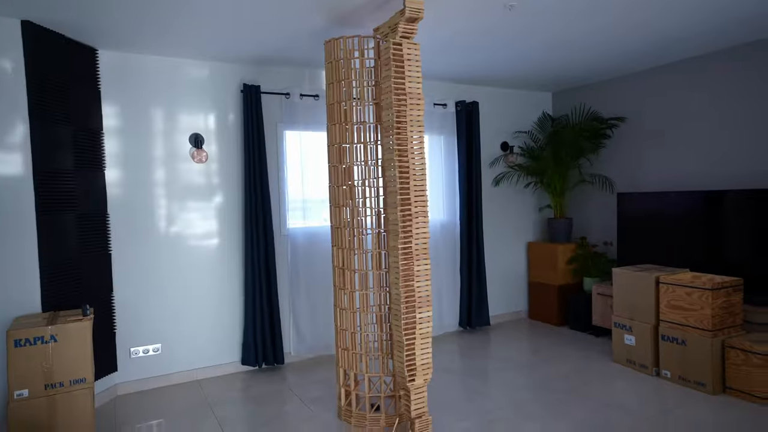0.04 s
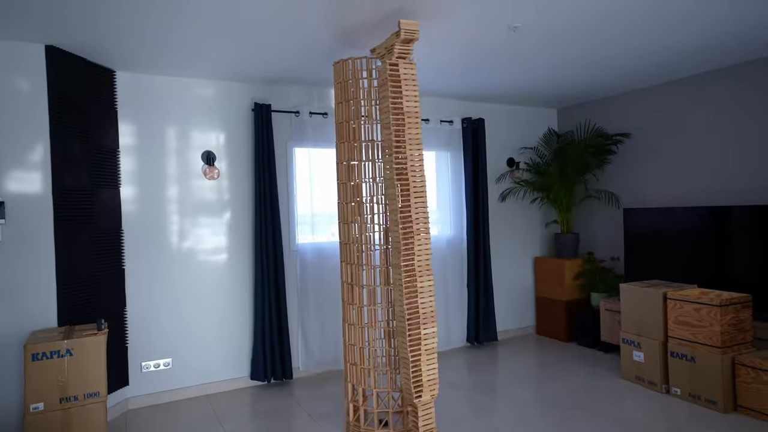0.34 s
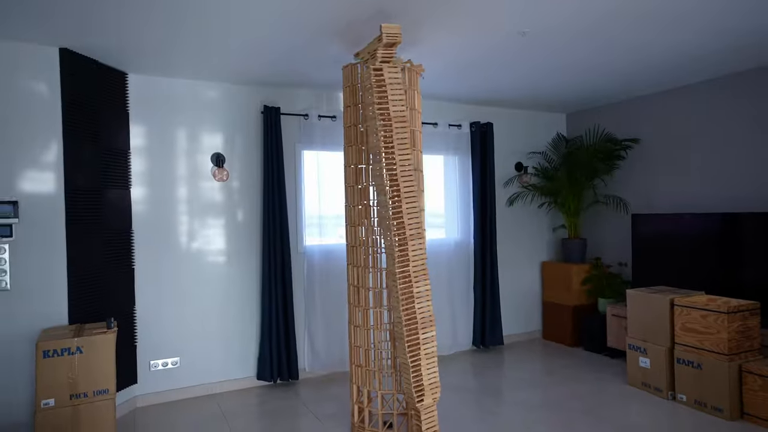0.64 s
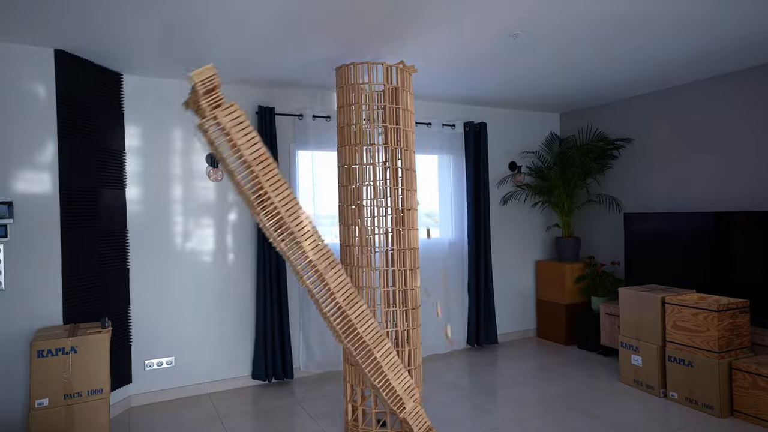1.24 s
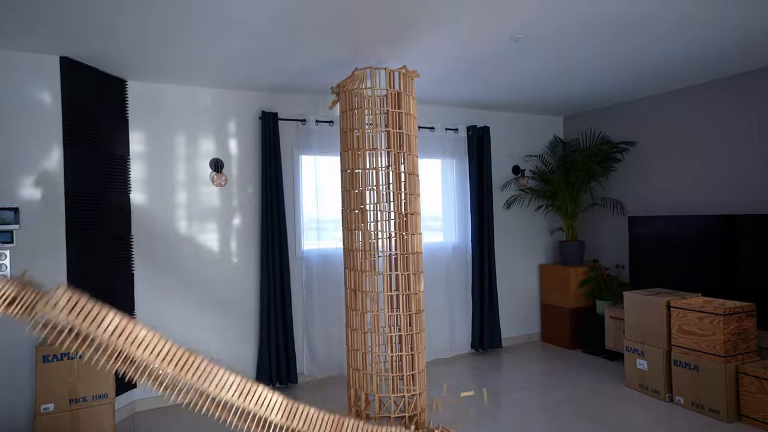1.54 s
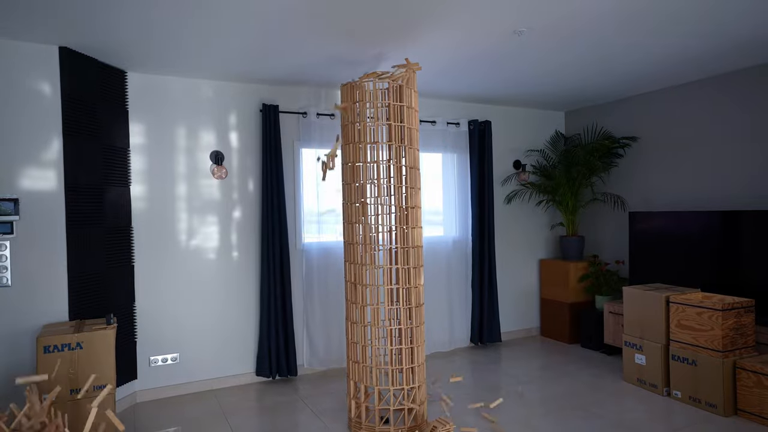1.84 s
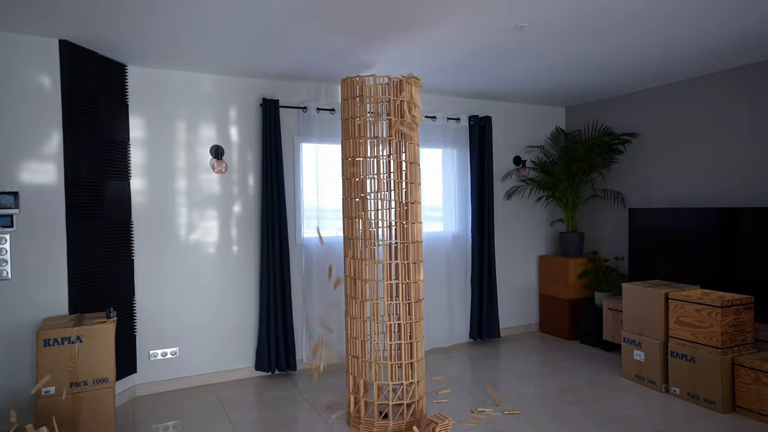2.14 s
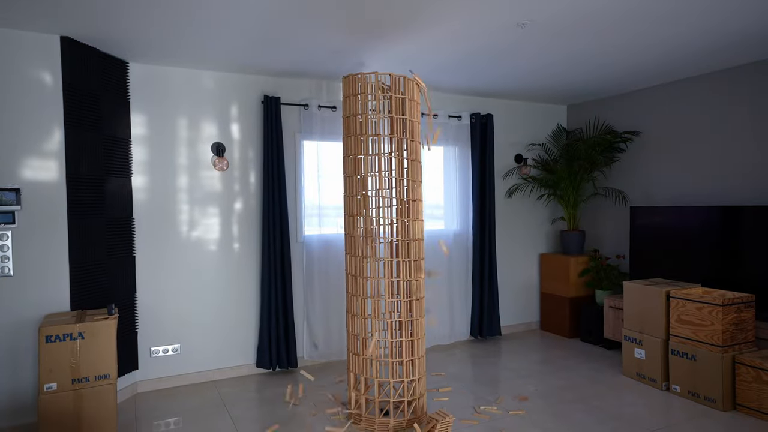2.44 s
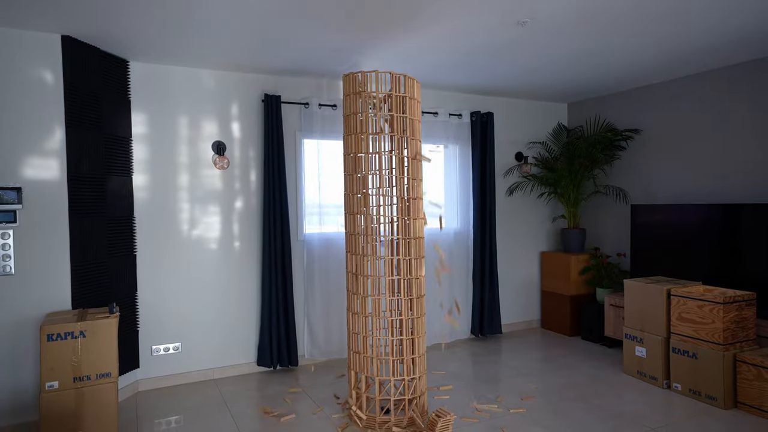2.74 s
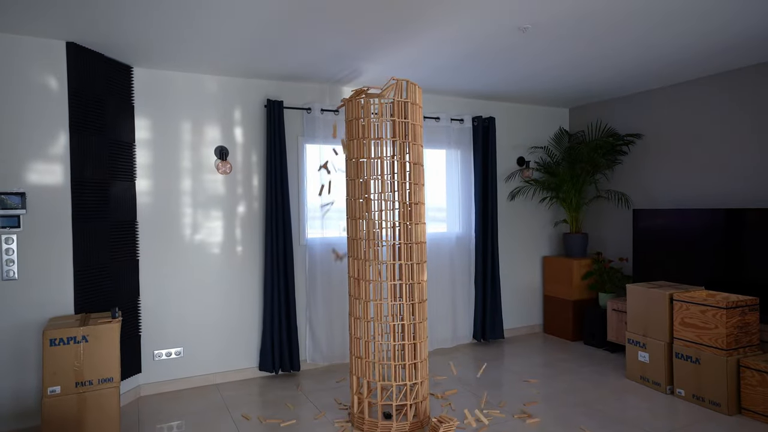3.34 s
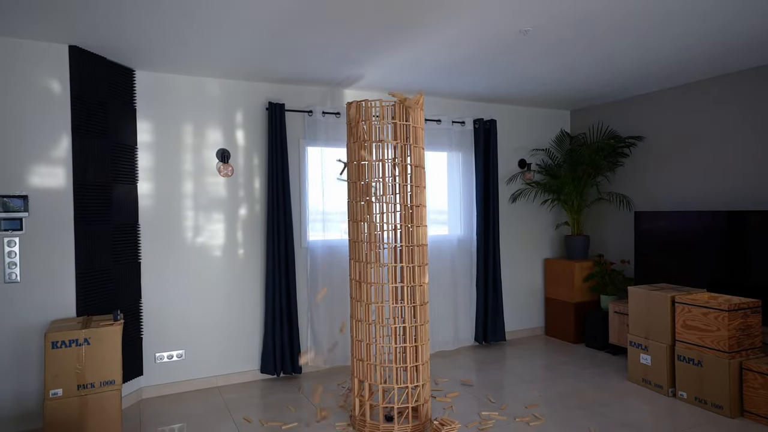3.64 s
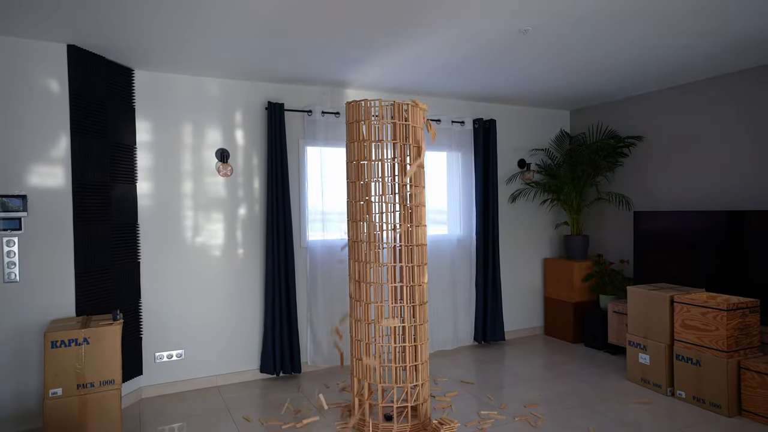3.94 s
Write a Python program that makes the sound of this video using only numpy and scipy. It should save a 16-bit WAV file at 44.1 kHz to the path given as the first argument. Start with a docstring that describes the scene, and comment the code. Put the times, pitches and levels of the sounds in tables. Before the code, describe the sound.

Small wooden planks clatter as a stack collapses in a bare, ringing room. For the first second they slip and tap lightly over a very faint hum. At about 1.3 seconds the stack gives way with a rattle and a loud crash, with dull thuds near 1.4 and 1.6 seconds. Planks keep showering onto the hard floor in batches until about 4 seconds, with sharp single landings standing out.

```python
"""A tall stack of small wooden planks collapses on a hard floor in a bare, ringing room.
First it leans: planks slip softly and loose ones tap, over a faint hum. At 1.27 s it gives way: a
lower-pitched piece chatters, the hum sinks, two dull thuds follow. Planks then rain down in batches,
each contact a dry crack, a dull knock and ringing bending modes; single hard landings stand out."""
import sys
import numpy as np
from scipy import signal
from scipy.fft import rfft, irfft, next_fast_len
from scipy.io import wavfile
from scipy.ndimage import uniform_filter1d, minimum_filter1d

SR = 44100
rng = np.random.default_rng(int(sys.argv[2]) if len(sys.argv) > 2 else 0)


def log_audio(samples):
    """Write samples as a 16-bit WAV file to the path given in sys.argv[1]."""
    # one column per channel
    frames = np.atleast_2d(samples).T
    # limit to full scale, then quantise
    limited = np.clip(frames, -1, 1)
    pcm = np.round(limited * 32767).astype(np.int16)
    wavfile.write(sys.argv[1], SR, pcm)


N = 176400

# planks that slip or land together: start_s, end_s, first_mode_hz, level_db, hardness_db, weight_db
# hardness offsets cracks and higher modes; weight offsets knocks
BATCHES = [(0, 0.116, 2716, -23, 3.5, -7), (0.173, 0.275, 2760, -27.5, -8, -7),
           (0.304, 0.377, 2840, -27.5, 3.5, -6.5), (0.43, 0.522, 2970, -36.5, 11.5, -4),
           (0.666, 0.76, 2824, -30.5, 5, -15), (0.837, 0.93, 2900, -35, 4.5, -1.5),
           (0.898, 0.99, 2760, -35.5, 0.5, -1.5), (1.026, 1.085, 2440, -24, -5.5, -8),
           (1.13, 1.28, 2710, -32, 4.5, -7.5), (1.381, 1.571, 2840, -12, -6, -20.5),
           (1.6, 1.77, 2760, -24.5, 9.5, -8), (1.774, 1.917, 2740, -19.5, 3.5, -13),
           (1.991, 2.26, 2806, -21, 1, -17.5), (2.232, 2.338, 2680, -20, 5.5, -15),
           (2.374, 2.606, 2644, -18.5, 0, -22.5), (2.609, 2.773, 2747, -19.5, 1.5, -15.5),
           (2.864, 3.008, 2540, -24, 3, -11), (2.963, 3.147, 2624, -29, 10, -11),
           (3.161, 3.233, 2800, -20, 0, -17.5), (3.302, 3.59, 2840, -22.5, -1.5, -15),
           (3.559, 3.74, 2726, -27, 8.5, -22), (3.774, 3.882, 2810, -23, 2, -13)]
# crack spectrum: freq_hz, gain_db
CRACK_SPECTRUM = [(100, -46), (900, -18), (1800, 5.5), (3600, 11.5), (7500, 10.5), (10900, 1.5),
                  (12800, 8.5), (13900, -0.5), (15500, 1)]
# knock spectrum: freq_hz, gain_db
KNOCK_SPECTRUM = [(60, -19), (120, 0.5), (280, 1), (500, -3.5), (1000, 3), (1700, 6), (3000, 8.5),
                  (8000, -23)]
COLLAPSE_S, CRACK_T60_S = 1.267, .0073


def shower(count=4400, knock_t60_s=.027, slip_cutoff_hz=11200):
    """Hundreds of planks hit each other and the floor, each with its own pitch and force."""
    # plank modes, lowest bending mode first: pitch_hz, level_db, t60_s
    modes = [(2759, -4.5, 0.023), (5875, -9, 0.0047), (6670, -7.5, 0.033), (7444, -8, 0.0095),
             (11040, -17, 0.028)]
    start_s, _, batch_hz, level_db, hardness_db, weight_db = np.transpose(BATCHES)
    first_gain, hard_gain = batch_envelope(level_db), batch_envelope(level_db + hardness_db)
    knock_gain = batch_envelope(level_db + weight_db, trickle_db=-46.5, release_s=.048)
    times, force, plank = contacts(count)
    sharpness = amp(7.5 * scatter(count))
    place = places(count)
    knocks = coloured(burst(times, force, knock_t60_s, places(count, width=.7)), KNOCK_SPECTRUM)
    cracks = coloured(burst(times, force * sharpness, CRACK_T60_S, place, size=200), CRACK_SPECTRUM)
    out = even(knocks) * amp(1.5) * knock_gain + even(cracks) * amp(-6) * hard_gain
    batch = np.maximum(np.searchsorted(start_s, times) - 1, 0)
    batch_pitch = batch_hz[batch] / modes[0][0]
    for k, (hz, db, t60_s) in enumerate(modes):
        detune = scatter(count)[plank]
        pitch = np.exp(.044 * detune) if k else batch_pitch * np.exp(.066 * detune)
        mode = ring(times, force * rng.choice([-1, 1], count), hz * pitch, t60_s, place)
        out += even(mode) * amp(db) * (hard_gain if k else first_gain)
    # before the collapse planks only slip: less top end
    slipping = filtered(out, lambda f: 1 / np.hypot(1, (f / slip_cutoff_hz) ** 4))
    return np.where(np.arange(N) / SR < COLLAPSE_S, slipping, out)


def contacts(count, strikes=7, rate_per_s=850, gap_s=.009, spread_db=6.5):
    """Each plank strikes several times, 1 dB weaker each time: times, force, plank index."""
    plank, bounce = np.divmod(np.arange(count), strikes)
    settle_s = strikes * (plank + rng.random(count)[plank]) / rate_per_s
    times = settle_s + gap_s * (bounce + rng.random(count) - strikes)
    force = amp(spread_db * scatter(count)[plank] - bounce)
    return times, force * (times >= 0), plank


def batch_envelope(level_db, trickle_db=-38, release_s=.032, sag_db=3, trickle_db_per_s=1):
    """Each batch starts at once, thins and dies away, over a growing trickle of stray planks."""
    t = np.arange(N) / SR
    power = amp(trickle_db + trickle_db_per_s * t) ** 2
    for (start_s, end_s, *_), db in zip(BATCHES, level_db):
        span = slice(int(start_s * SR), None)
        progress = np.minimum((t[span] - start_s) / (end_s - start_s), 1)
        release = np.exp(-np.maximum(t[span] - end_s, 0) / release_s)
        power[span] += (amp(db - sag_db * (progress - .5)) * release) ** 2
    return np.sqrt(power)


def landings(first_t60_s=.08, second_t60_s=.036):
    """Single planks crack down and ring in two modes as they bounce."""
    # hard landings: start_s, crack_db, first_hz, second_hz, first_db, second_db
    hits = [(0.179, -19.5, 2565, 6700, -23, -18.5), (0.2235, -28, 3395, 7100, -21, -40),
            (0.3089, -20.5, 2895, 6640, -21.5, -20), (0.428, -20, 3390, 6800, -22.5, -25),
            (0.511, -21, 3280, 6670, -31, -22), (0.841, -21, 3100, 7700, -33, -43),
            (0.8905, -20.5, 2350, 6240, -45, -22), (0.919, -6.5, 3100, 5700, -49, -39),
            (1.211, -12, 3000, 6440, -47, -24), (1.2659, -5.5, 2040, 5000, -20, -12),
            (1.3856, -3, 2750, 6790, -36, -8), (1.6047, -22, 3000, 7010, -35, -21),
            (1.9449, -5, 2500, 7680, -47, -16), (2.2385, -7, 2985, 6700, -15, -37),
            (2.272, -16, 2780, 6530, -32, -9), (2.882, -7, 2413, 6600, -16, -19),
            (2.9846, -19, 2718, 7090, -15, -14), (3.038, -22, 2550, 5920, -26, -15.5),
            (3.0918, -14, 2400, 7220, -40, -15.5), (3.312, -12, 2730, 7150, -27, -11.5),
            (3.4262, -6, 2820, 6790, -30, -9.5), (3.5836, -14, 2335, 6180, -20.5, -18),
            (3.7213, -27, 3020, 7290, -56, -10), (3.8138, -22, 2760, 6340, -26, -13)]
    times, loss_db, rebound, (crack_db, first_hz, second_hz, first_db, second_db) = bounces(hits, 7)
    place = places(len(times), width=.47)
    detune = 1 + .0052 * rng.standard_normal((2, len(times))) * rebound
    crack = burst(times, amp(crack_db - 4.5 - 1.65 * loss_db), CRACK_T60_S, place)
    first = ring(times, amp(first_db + .5 - loss_db), first_hz * detune[0], first_t60_s, place)
    second = ring(times, amp(second_db + 3.5 - loss_db), second_hz * detune[1], second_t60_s, place)
    return coloured(crack, CRACK_SPECTRUM) + first + second


def thuds(t60_s=.17, centre_hz=480):
    """Many planks land flat at once: full, dull thuds."""
    # stack hits the floor, foot first: start_s, level_db
    hits = [(1.385, -6), (1.557, -11.5)]
    times, db = np.transpose(hits)
    puffs = burst(times, amp(db), t60_s, places(len(times), width=0), size=6000)
    band_pass = lambda f: (f / centre_hz) / (1 + (f / centre_hz) ** 2)
    return filtered(puffs, lambda f: amp(along(KNOCK_SPECTRUM, f)) * band_pass(f))


def chatter(count=40, end_s=1.375, rate_per_s=220):
    """A lower-pitched piece rattles rapidly as the stack gives way."""
    # its modes: pitch_hz, level_db, t60_s
    modes = [(2062, -27.5, 0.038), (5200, -28, 0.0021), (5450, -19, 0.017), (7580, -25, 0.011),
             (9930, -27, 0.0065)]
    times = COLLAPSE_S + (np.arange(count) + rng.random(count)) / rate_per_s
    force = amp(2 * rng.standard_normal(count)) * (times < end_s)
    place = places(count)
    duty = (end_s - COLLAPSE_S) * SR / N
    out = 0
    for hz, db, t60_s in modes:
        mode = ring(times, force, hz * (1 + .024 * rng.standard_normal(count)), t60_s, place)
        out += amp(db) * mode * np.sqrt(duty / np.mean(mode ** 2))
    return out


def corner_hits(t60_s=.018):
    """A plank landing on a corner skitters and rings one very high mode."""
    # corner landings: start_s, pitch_hz, level_db
    hits = [(0.672, 13000, -25), (1.946, 11000, -8), (2.268, 10900, -9), (2.642, 13000, -13),
            (3.672, 11700, -15)]
    times, loss_db, rebound, (hz, db) = bounces(hits, 6)
    pitch_hz = hz * np.exp(.06 * rng.standard_normal(len(times)) * rebound)
    return ring(times, amp(db - loss_db), pitch_hz, t60_s, places(len(times), width=.5))


def loose_planks(count=12, end_s=.5, t60_s=.084):
    """The same few planks keep tapping as the stack starts to lean, so their notes stand out."""
    # their modes: pitch_hz, level_db
    modes = [(2625, -27), (2905, -24.5), (3790, -35), (6740, -31), (11080, -51)]
    times = end_s * (np.arange(count) + rng.random(count)) / count
    place = places(count, width=.99)
    return sum(ring(times, amp(db + 1.5 * rng.standard_normal(count)), np.full(count, hz), t60_s, place)
               for hz, db in modes)


def room(x, hop=6300, tail_s=.6):
    """Bare room: a diffuse tail, redrawn each hop to stay a smooth wash without fixed ringing tones."""
    # room decay: freq_hz, t60_s
    decay = [(100, 0.61), (500, 0.55), (2800, 0.46), (7000, 0.65), (15000, 0.071)]
    # left-right likeness, high in the bass: freq_hz, correlation
    likeness = [(500, 0.99), (1000, 0.6), (2000, 0.32), (12000, 0.25)]
    # spectrum sent into the room: freq_hz, gain_db
    send_spectrum = [(200, -2.5), (2800, 1.5), (7000, 0), (14000, 2.5)]
    hz, t, _ = signal.stft(np.zeros(int(tail_s * SR)), SR, nperseg=256)
    t60_s = along(decay, hz)[:, None]
    angle = np.arccos(np.clip(along(likeness, hz), -1, 1)) / 2
    mid_side = np.array([np.cos(angle), np.sin(angle)])[:, :, None]
    shape = np.exp(-np.log(1000) * t / t60_s) / np.sqrt(t60_s) * mid_side
    send = np.pad(coloured(x, send_spectrum), hop)
    window = signal.get_window("hann", 2 * hop) ** .5
    out = np.zeros((2, N + 2 * SR))
    for start in range(0, N + 1, hop):
        noise = rng.standard_normal(shape.shape) + 1j * rng.standard_normal(shape.shape)
        mid, side = signal.istft(shape * noise, SR, nperseg=256)[1]
        tail = np.array([mid + side, mid - side]) / np.linalg.norm(mid + side)
        tail = np.pad(tail, ((0, 0), (130, 0)))  # 3 ms pre-delay
        echo = signal.fftconvolve((send[start:start + 2 * hop] * window)[None], tail, axes=1)
        out[:, start:start + echo.shape[1]] += echo
    return out[:, hop:hop + N]


def hum(pitch_hz=49):
    """A faint low hum swells slightly, then sinks as the crash begins."""
    # hum envelope: time_s, level_db
    envelope = [(0, -70), (1.27, -65), (1.31, -92)]
    t = np.arange(N) / SR
    return np.sqrt(2) * np.sin(2 * np.pi * pitch_hz * t) * amp(np.interp(t, *np.transpose(envelope)))


def bounces(table, count, gap_s=.008, loss_db=3.3):
    """Each row strikes count times: times, total loss in dB, rebound flag, remaining columns."""
    start_s, *columns = np.repeat(table, count, axis=0).T
    bounce = np.tile(np.arange(count), len(table))
    rebound = bounce > 0
    times = start_s + gap_s * (bounce + rebound * rng.uniform(-.5, .5, len(start_s)))
    return times, loss_db * bounce, rebound, columns


def ring(times, gain, hz, t60_s, place, attack_s=.000069):
    """One mode, struck at each time: a dying sine."""
    t = np.arange(int(np.clip(t60_s, .005, .1) * SR * 2 / 3), dtype=np.float32) / SR
    envelope = np.exp(-np.log(1000) * t / t60_s) * (1 - np.exp(-t / attack_s))
    waves = np.sin(2 * np.pi * hz.astype(np.float32)[:, None] * t) * envelope
    return spread(times, waves * gain[:, None], place)


def burst(times, gain, t60_s, place, size=600):
    """A dying puff of noise at each time."""
    fade = np.exp(-np.log(1000) * np.arange(size) / SR / t60_s)
    return spread(times, rng.standard_normal((len(times), size)) * fade * gain[:, None], place)


def places(count, width=1, pan_db=2, delay_s=.00012):
    """Random contact positions: left and right gain and delay."""
    side = width * rng.standard_normal(count) * np.array([[.5], [-.5]])
    return amp(pan_db * side), -delay_s * side


def spread(times, waves, place):
    """Sum one wave per contact into stereo."""
    out = []
    for gain, delay_s in zip(*place):
        onset = np.maximum(np.round((times + delay_s) * SR), 0).astype(int)
        index = onset[:, None] + np.arange(waves.shape[1])
        out.append(np.bincount(index.ravel(), (waves * gain[:, None]).ravel(), N)[:N])
    return np.array(out)


def scatter(count):
    """Normal draws, clipped at 2 sigma."""
    return np.clip(rng.standard_normal(count), -2, 2)


def amp(db):
    """Decibels to gain."""
    return 10 ** (np.asarray(db) / 20)


def even(x, size=4400):
    """Scale to a running rms of 1, keeping single clicks."""
    power = uniform_filter1d(uniform_filter1d(np.mean(x ** 2, 0), size), size // 2)
    return x / np.sqrt(np.abs(power) + 1e-12)


def along(points, hz):
    """Interpolate (freq_hz, value) points on a log axis."""
    freq_hz, value = np.transpose(points)
    return np.interp(np.log(hz + 1), np.log(freq_hz + 1), value)


def filtered(x, response):
    """Zero-phase filter with gain response(freq_hz)."""
    size = next_fast_len(N + SR // 2)
    return irfft(rfft(x, size) * response(np.fft.rfftfreq(size, 1 / SR)), size)[..., :N]


def coloured(x, spectrum):
    """Filter by (freq_hz, gain_db) points."""
    return filtered(x, lambda f: amp(along(spectrum, f)))


def scene(low_cut_hz=234):
    """Planks fall slightly to the right in the room; the deep bass is cut away."""
    # stereo balance: freq_hz, left_over_right_db
    balance = [(200, -0.5), (2500, -1.2), (7000, -3), (13000, -2.2)]
    bulk = shower()
    accents = landings() + corner_hits() + loose_planks() + thuds() + chatter()
    send = bulk[0] + amp(.5) * accents[0]
    wood = amp(.5) * (bulk + accents) + amp(-3) * room(send)
    low_cut = lambda f: (f / low_cut_hz) ** 2 / np.hypot(1, (f / low_cut_hz) ** 2)
    pan = lambda f: amp(along(balance, f) * np.array([[.5], [-.5]]))
    return filtered(wood, lambda f: low_cut(f) * pan(f)) + hum()


def record(dry, limit_db=-6, window_s=.0014, top_hz=15850):
    """Fast peak limiter, then a brick-wall low-pass."""
    size = int(window_s * SR)
    needed = np.minimum(1, amp(limit_db) / (np.abs(dry).max(0) + 1e-9))
    gain = uniform_filter1d(minimum_filter1d(needed, size), size)
    return filtered(dry * gain, lambda f: f < top_hz)


dry = scene()
out = record(dry)
log_audio(out)
```